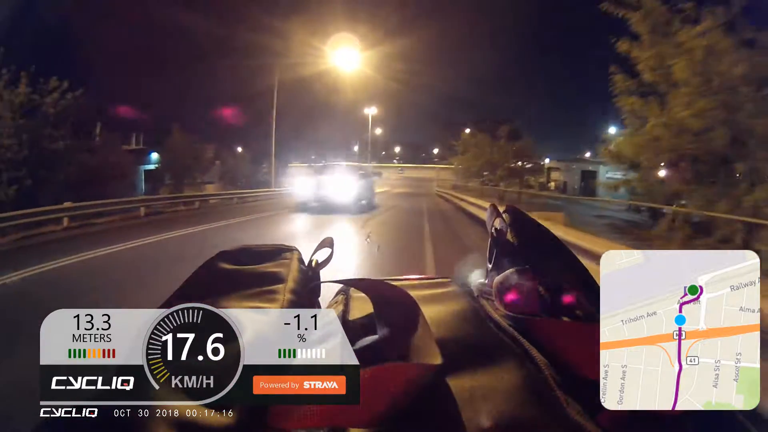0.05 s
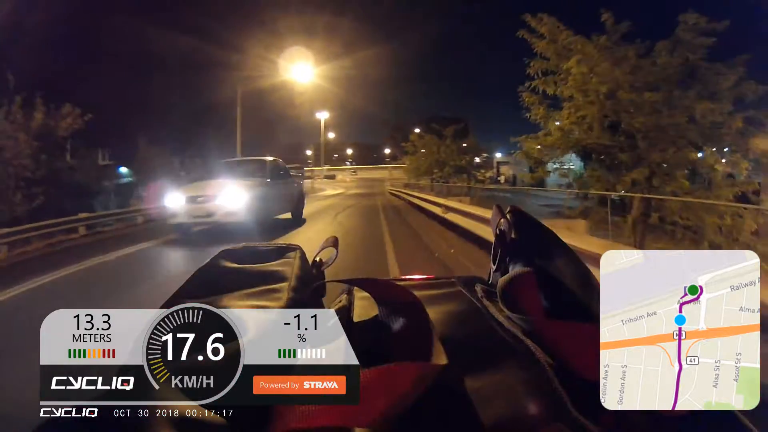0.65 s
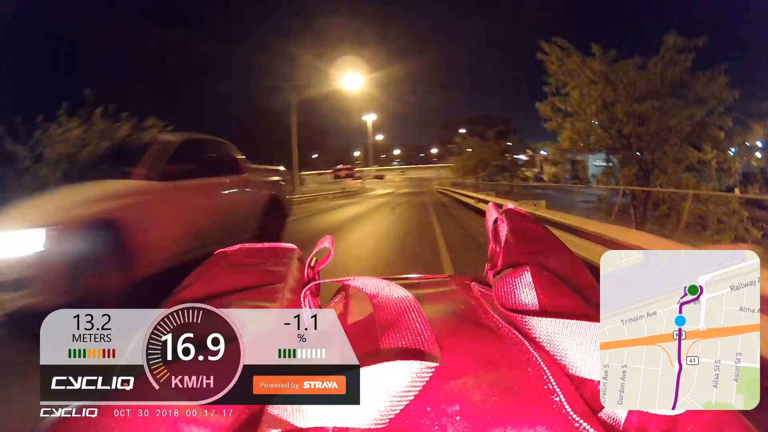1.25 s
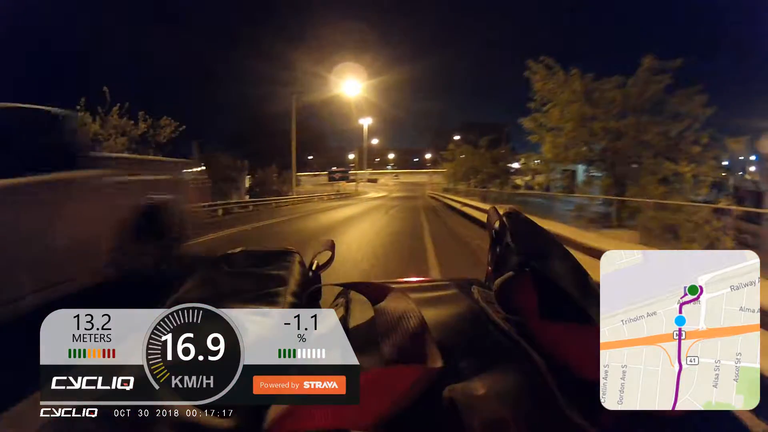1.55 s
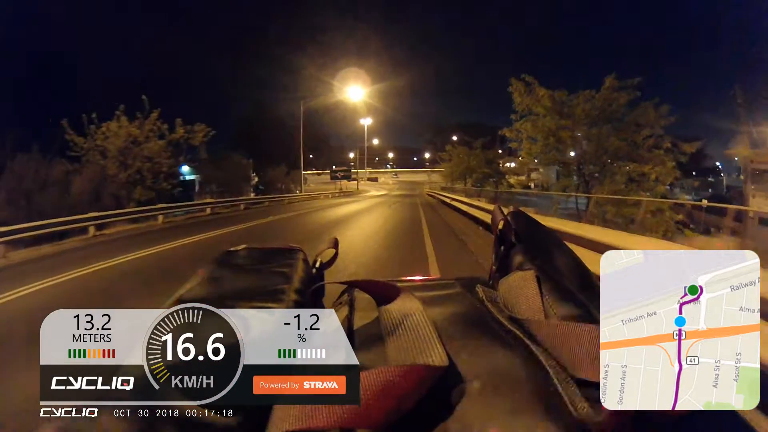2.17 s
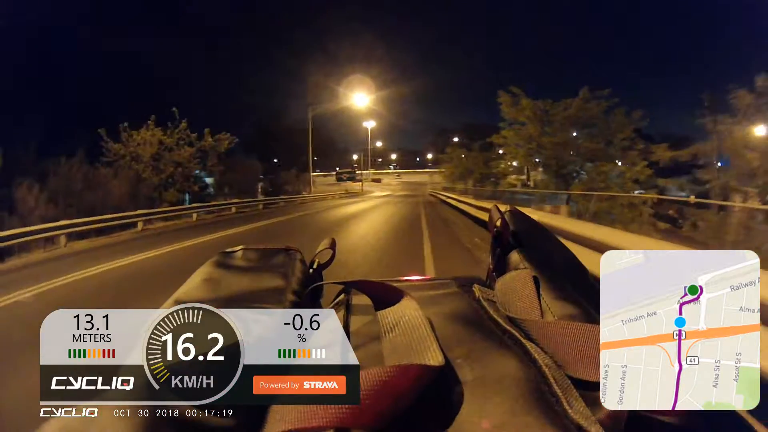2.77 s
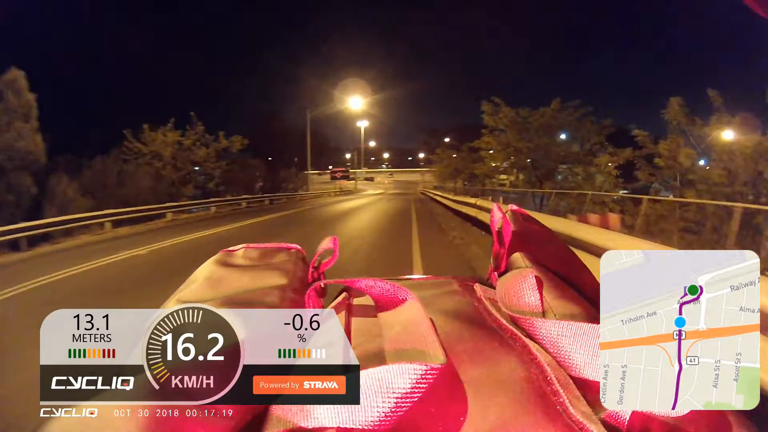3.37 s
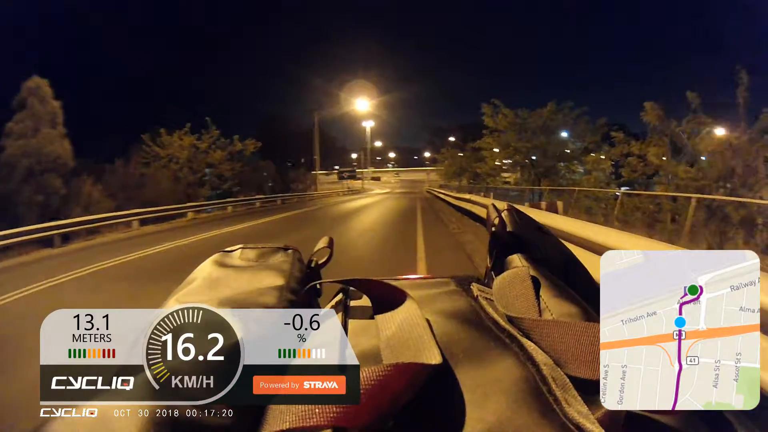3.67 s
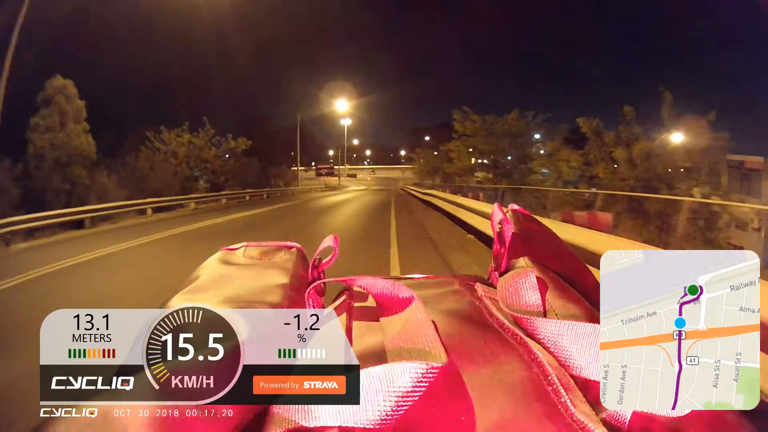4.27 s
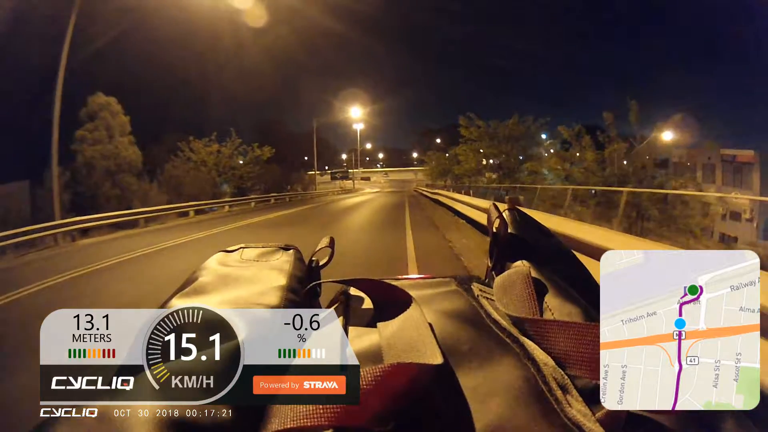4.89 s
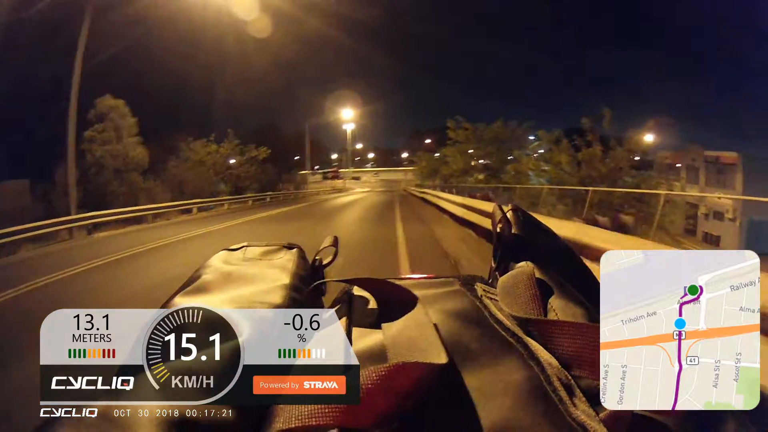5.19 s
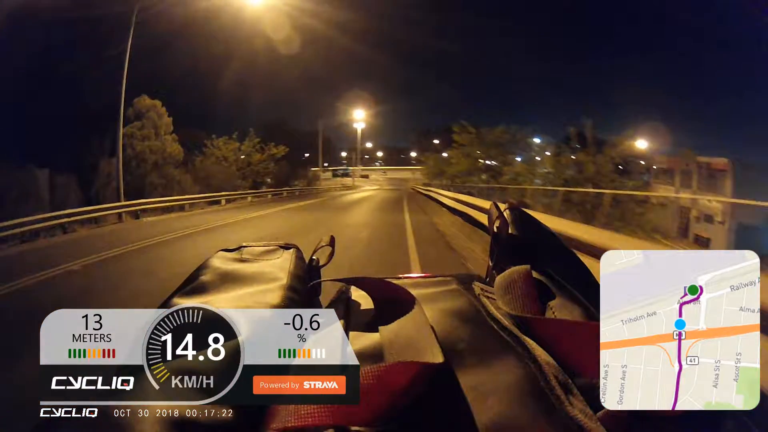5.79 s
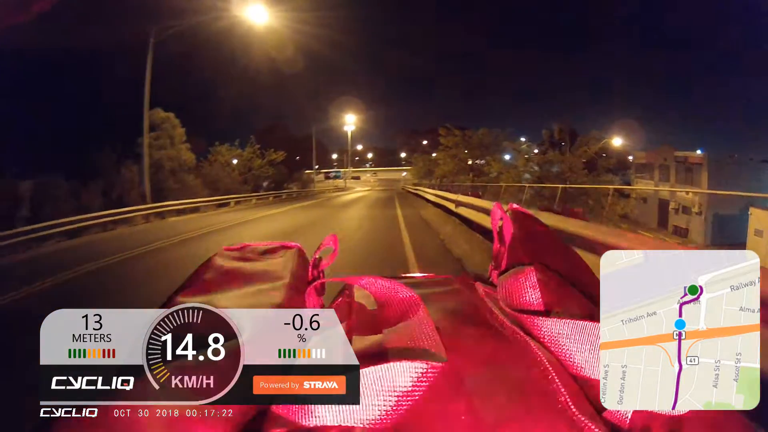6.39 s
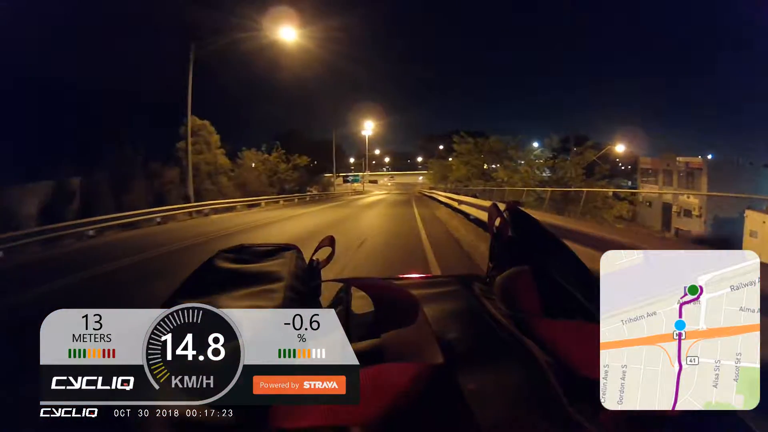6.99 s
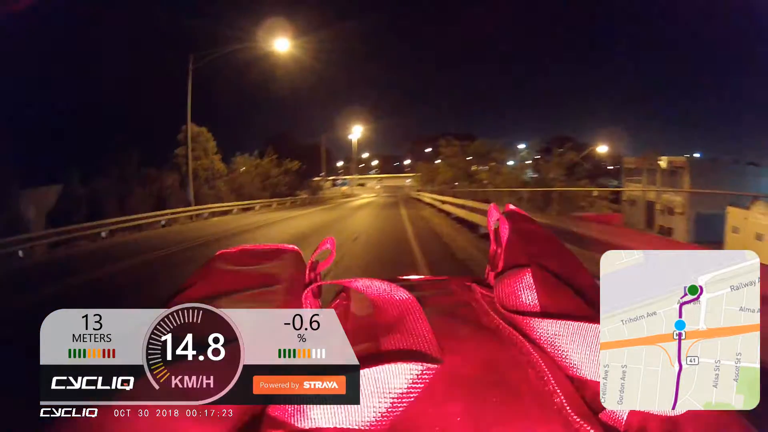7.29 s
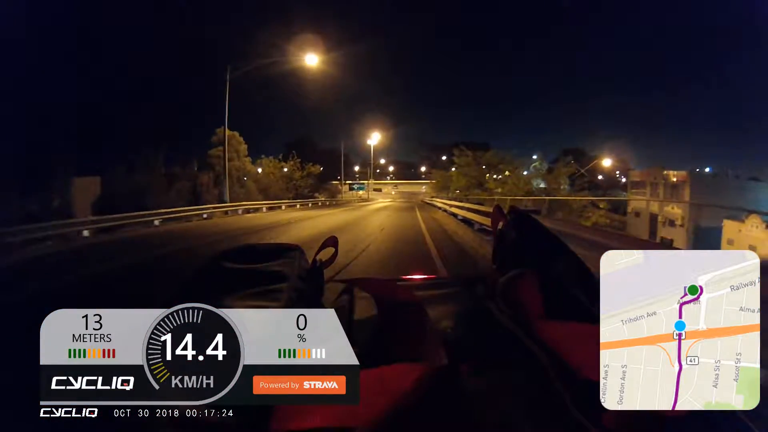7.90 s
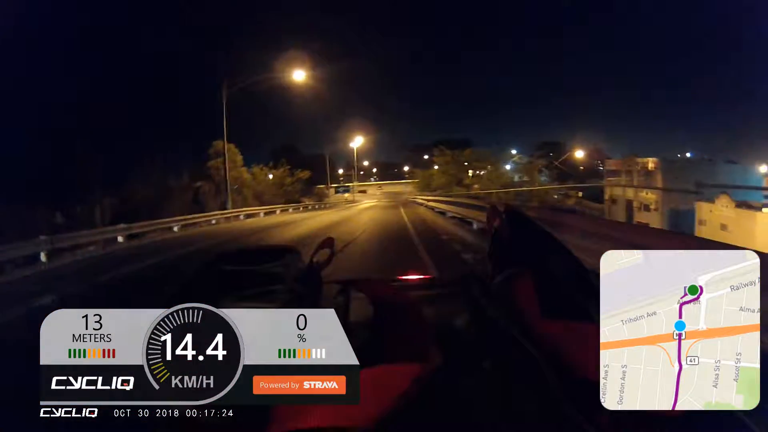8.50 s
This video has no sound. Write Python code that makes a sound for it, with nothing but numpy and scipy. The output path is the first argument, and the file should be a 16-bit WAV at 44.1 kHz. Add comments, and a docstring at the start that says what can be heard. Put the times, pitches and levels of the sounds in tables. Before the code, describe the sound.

A loaded bicycle rolls over rough asphalt in the open air, heard from a microphone fixed to it. A steady hiss of wind and tyres and a low road rumble run throughout. From the start, loose fittings clack sharply and irregularly very close by, and a small metal part buzzes in short bursts. A car overtakes closely, its tyre roar swelling to a peak around 1.5 to 2 seconds and fading by about 4. Near 2 seconds, two quick bumps make the loudest crashes, followed by tiny metallic pings and more knocks until 3. From 3 to 5 seconds the ride is calmer, with light ticks and soft wheel thumps. Scattered clacks and brief rattles return from 5 seconds, clustering around 6.3, 7.5 and 8.5 seconds. Near the end, another car faintly approaches from ahead.

```python
"""A road at night, from the two microphones of a rear-facing camera fixed to a loaded bicycle.
Close by, loose fittings clack and a small metal part buzzes, ringing the camera's mount; two bumps
crash through the frame and softer thumps follow. Rough asphalt rumbles under a steady hiss of wind
and tyres. A car overtakes two metres away, and another draws near from far ahead."""
import sys
import numpy as np
from scipy import signal
from scipy.fft import irfft, next_fast_len
from scipy.io import wavfile
from scipy.ndimage import uniform_filter1d

SR = 44100
rng = np.random.default_rng(int(sys.argv[2]) if len(sys.argv) > 2 else 0)


def persist_wave(psi):
    """Save psi, clipped to +-1, as 16-bit WAV."""
    counts = np.round(np.clip(psi, -1, 1) * 32767).astype(np.int16)
    wavfile.write(sys.argv[1], SR, np.atleast_2d(counts).T)


N = 381465
HIT = np.arange(SR // 8) / SR  # time within one blow, s
DETUNE, SCATTER_DB = 0.005, 1.3  # how the mount's modes vary in pitch and level from contact to contact

# deep rumble of the rolling wheels: frequency_hz, density_db
WHEEL_SPECTRUM = [(25, -17), (55, -13), (88, 4), (115, -0.5), (170, 2.5), (260, -3.5), (450, -2),
                  (750, -21.5), (2500, -59)]
# unpitched crack of a contact: frequency_hz, density_db
CRACK_SPECTRUM = [(100, -54), (400, -5), (750, -1.5), (1050, 7.5), (1300, 1), (1600, 3), (3200, 3),
                  (4200, -0.5), (7500, -5), (10000, -7.5), (12000, -10), (16000, -18)]
# bounces of the load: start_s, level_db, length_s
LOAD_BOUNCES = [(0.029, -30, 0.011), (0.047, -34, 0.034), (0.088, -32, 0.018), (0.104, -32.5, 0.029),
                (0.146, -32, 0.022), (0.181, -28, 0.017), (0.194, -28.5, 0.021), (0.237, -32, 0.027),
                (0.276, -35.5, 0.032), (0.698, -38.5, 0.026), (1.203, -32, 0.014), (1.257, -35.5, 0.019),
                (1.29, -31.5, 0.031), (1.342, -28, 0.041), (1.379, -27.5, 0.048), (1.447, -29.5, 0.013),
                (1.48, -28, 0.033), (1.537, -30, 0.0084), (1.633, -33, 0.0089), (2.023, -28.5, 0.021),
                (6.252, -41, 0.018)]


def gain_of(db):
    """Decibels to amplitude."""
    return 10 ** (np.asarray(db) / 20)


def unit_rms(x):
    """Scales to rms 1."""
    return x / np.sqrt(np.mean(x ** 2) + 1e-20)


def curve_at(points, hz):
    """Interpolates a curve on a log-frequency axis."""
    point_hz, value = np.transpose(points)
    return np.interp(np.log(hz + 1), np.log(point_hz), value)


def add(mix, start_s, sound):
    """Adds a stereo sound to the mix at start_s."""
    part = mix[:, max(round(start_s * SR), 0):][:, :sound.shape[1]]
    part += sound[:, :part.shape[1]]


def pan(left_db):
    """Gains that make the left microphone left_db louder than the right."""
    return gain_of(np.array([[0.5], [-0.5]]) * left_db)


def highpass(x, hz):
    """The part of x above hz, with a gentle slope."""
    return signal.sosfiltfilt(signal.butter(2, hz, "high", fs=SR, output="sos"), x)


def resonance(x, hz, width_hz):
    """One resonance of gain 1."""
    return signal.lfilter(*signal.iirpeak(hz, hz / width_hz, fs=SR), x)


def wander(per_s):
    """A random curve of rms 1 with per_s turning points a second."""
    knots_s = np.arange(0, N / SR + 1, 1 / per_s)
    return unit_rms(np.interp(np.arange(N) / SR, knots_s, rng.standard_normal(len(knots_s))))


def noise(spectrum, size, lean=None, shared=0.0):
    """Coloured stereo noise; a share of its power is common to both microphones."""
    padded = next_fast_len(size)
    hz = np.fft.rfftfreq(padded, 1 / SR)
    bins = rng.standard_normal((3, len(hz))) + 1j * rng.standard_normal((3, len(hz)))
    bins = (np.sqrt(1 - shared) * bins[:2] + np.sqrt(shared) * bins[2]) * gain_of(curve_at(spectrum, hz))
    if lean is not None:
        bins *= pan(curve_at(lean, hz))
    return unit_rms(irfft(bins, padded)[:, :size])


def airborne(spectrum, lean, slant):
    """Noise through the air, partly alike at the two microphones; with more slant the left leads more."""
    # likeness of the two microphones: frequency_hz, correlation
    likeness = [(400, 0.63), (800, 1), (1800, 0.31), (5000, 0.04)]
    # phase between them at a slant of 1: frequency_hz, left_lead_rad
    lead = [(400, 0.41), (600, 3), (820, 2.7), (1500, 3.87)]
    padded = next_fast_len(N)
    hz = np.fft.rfftfreq(padded, 1 / SR)
    common, separate = rng.standard_normal((2, len(hz))) + 1j * rng.standard_normal((2, len(hz)))
    alike = curve_at(likeness, hz)
    left = common * np.exp(1j * slant * curve_at(lead, hz))
    right = alike * common + np.sqrt(1 - alike ** 2) * separate
    bins = np.array([left, right]) * gain_of(curve_at(spectrum, hz)) * pan(curve_at(lean, hz))
    return unit_rms(irfft(bins, padded)[:, :N])


def frame(push):
    """A push sounds through the hollows of the frame and its load, with little left below them."""
    # hollow resonances: pitch_hz, width_hz, level_db
    hollows = [(296.5, 28, 1), (339.5, 25, 3.5), (391, 39, 3), (460, 74, 0.5), (567, 47, 2.5)]
    body = sum(gain_of(db) * resonance(push, hz, width_hz) for hz, width_hz, db in hollows)
    return unit_rms(highpass(body, 171))


def mount(ring, tilt_db, scatter_db=0.0, detune=0.0):
    """The camera's mount rings from one tap; ring scales its decay times, and tilt_db is per octave."""
    # its modes at the microphones: pitch_hz, t60_s, left_db, right_db, left_lead_rad
    modes = [(1014.5, 0.04, -10, -12.5, 1.5), (1153, 0.048, -13, -27, -5.5),
             (1401, 0.044, -18.5, -30.5, -1), (1597, 0.043, -11.5, -17, -1.74),
             (1930, 0.011, -3, -18, -5.5), (2180, 0.0067, -4, -38, -11), (2531, 0.039, -7, -12.5, -0.8),
             (2900, 0.0033, 6, -35, 9), (3375, 0.027, 0, -10, -3), (4280, 0.05, -52, -16, 1.5),
             (5300, 0.033, -28, -14, -7), (6850, 0.012, -24, -15.5, 1.5), (8220, 0.012, -11.5, -11.5, 2),
             (10350, 0.0076, -13, -25, 5)]
    hz, t60_s, left_db, right_db, lead = np.transpose(modes)[:, :, None]
    # the place of the tap varies each mode's share and pitch, the pitch more above 3 kHz
    hz = hz * (1 + detune * np.maximum(1, hz / 3000) ** 2 * rng.uniform(-0.82, 1, hz.shape))
    share = gain_of(tilt_db * np.log2(hz / hz[0]) + scatter_db * rng.standard_normal(hz.shape))
    decay = share * gain_of(-60 * HIT / (t60_s * ring))
    phase = 2 * np.pi * hz * HIT + np.pi * np.arange(len(hz))[:, None]  # neighbours swing oppositely
    left = gain_of(left_db) * decay * np.sin(phase)
    right = gain_of(right_db) * decay * np.sin(phase - lead)
    return np.array([left.sum(0), right.sum(0)])


def shaking(steady_db, jolt_db=-12, smooth_s=0.165):
    """Strength of the road's shaking in dB: steady, but harder wherever the load bounces."""
    t = np.arange(N) / SR
    jolt_power = sum(gain_of(db + jolt_db) ** 2 * ((t >= start_s) & (t < start_s + length_s))
                     for start_s, db, length_s in LOAD_BOUNCES)
    return 10 * np.log10(gain_of(steady_db) ** 2 + uniform_filter1d(jolt_power, round(smooth_s * SR)))


def road(grit_per_s=260, steady_db=-55):
    """Rough asphalt shakes the frame; its grit keeps the mount ringing and the metal part jingling."""
    shake_db = shaking(steady_db)
    rumble = noise(WHEEL_SPECTRUM, N, lean=[(70, -6), (200, -1.5)], shared=0.98)
    rumble *= gain_of(-61.5 + 3.7 * wander(12))
    body = frame(noise(WHEEL_SPECTRUM, N, shared=0.92)) * pan(1.4)
    body *= gain_of(shake_db + 0.084 * wander(12))
    grit = (rng.random(N) < grit_per_s / SR) * gain_of(6.1 * np.minimum(rng.exponential(1, N), 3))
    drive = (grit + 0.34) * rng.standard_normal(N)
    ringing = unit_rms(signal.oaconvolve(drive[None], mount(0.93, tilt_db=-7), axes=1)[:, :N])
    jingle = unit_rms(resonance(resonance(drive, 3386, 320), 3540, 600)) * pan(5.5)
    jingle *= gain_of(-64.5 + 3.5 * wander(22))
    ringing *= gain_of(-51.5 + 0.5 * (shake_db - steady_db) + 0.43 * wander(28))
    return rumble + body + jingle + ringing


def hiss():
    """Wind and the bicycle's own tyres, with a slight flutter and a slow drift in the middle range."""
    # colour of the hiss: frequency_hz, density_db
    spectrum = [(100, -57), (500, 7.5), (750, -5.5), (1100, -3.5), (1600, 1.5), (2500, -2.5), (3200, -8.5),
                (4800, -8.5), (7000, -15.5), (11000, -21), (16000, -26.5)]
    # its balance at the microphones: frequency_hz, left_over_right_db
    lean = [(700, 4), (1400, -16.5), (2500, -7.5), (3300, -1.5), (4600, -10), (8000, -1.5), (15000, 3)]
    air = airborne(spectrum, lean, slant=0.27)
    drift = (gain_of(wander(4.3)) - 1) * resonance(air, 2000, 2900)
    return (air + drift) * gain_of(-51 + 1.84 * wander(28))


def cars(loss_db_per_m=0.27, dull_db_per_m=1.5, shadow_m=17.2, drone_reach_m=3.52):
    """Tyre roar swells and brightens as a car nears, its treads howl, and its drone fills the frame."""
    # cars relative to the bicycle: start_ahead_m, speed_m_per_s, gap_m, alongside_db, howl_db, drone_db
    passes = [(-9, 5.5, 2.01, -34, -0.5, -9), (104, -10.5, 10.2, -30, -17, -16.5)]
    # tyre roar: frequency_hz, density_db
    spectrum = [(100, -67), (400, -1.5), (780, -1), (1050, 1), (1300, -1), (2600, 1.5), (3500, -4),
                (4500, -5.5), (7300, -11.5), (9200, -20), (12000, -20), (16000, -34)]
    # its balance at the microphones: frequency_hz, left_over_right_db
    lean = [(700, 0), (1300, -10), (2600, 4), (4500, -4.5), (15000, 5.5)]
    # bands the treads beam in different directions:
    # pitch_hz, width_hz, level_db, extra_left_db, loudest_ahead_m, reach_m
    tread_bands = [(1400, 1400, 0, -14, -6.5, 3.8), (12100, 4500, -25, -2, -3.5, 2),
                   (2650, 1700, -0.5, 13, 2.5, 1.5), (970, 1040, 0.5, -1.5, 7, 5.1)]
    roar = airborne(spectrum, lean, slant=0.86)
    sizzle = highpass(roar, 4200)
    tread = airborne(spectrum, lean, slant=0.62)
    beams = []
    for hz, width_hz, db, left_db, at_m, reach_m in tread_bands:
        band = resonance(resonance(tread, hz, width_hz), hz, width_hz) * pan(left_db)
        beams.append((gain_of(db) * unit_rms(band), at_m, reach_m))
    drone = frame(noise(WHEEL_SPECTRUM, N, shared=1)) * pan(1.8)
    out = np.zeros((2, N))
    for start_m, speed, gap_m, db, howl_db, drone_db in passes:
        ahead = start_m + speed * np.arange(N) / SR
        distance = np.hypot(ahead, gap_m)
        shadow = np.clip(ahead / shadow_m, 0, 1) ** 2  # the rider and bags screen a car that is ahead
        level_db = db - 20 * np.log10(distance / gap_m) - loss_db_per_m * (distance - gap_m) - 8 * shadow
        treble_db = 6.5 - dull_db_per_m * distance - 37 * shadow + 0.64 * wander(90)
        nose_db = -(ahead / distance) ** 2 * (ahead < 0)  # a car behind throws less roar forwards
        tyres = (roar + (gain_of(treble_db) - 1) * sizzle) * gain_of(nose_db)
        howl = sum(band * np.exp(-((ahead - at_m) / reach_m) ** 2) for band, at_m, reach_m in beams)
        drone_gain = gain_of(db + drone_db) * drone_reach_m / np.hypot(ahead, drone_reach_m)
        out += gain_of(level_db) * (tyres + gain_of(howl_db) * howl) + drone_gain * drone
    return out * gain_of(wander(22))


def blow(ring, crack_db, crack_s, treble_db, left_db, part_hz=3400, part_db=-6):
    """A short crack and the mount's ring, coloured by the loose part's broad resonance."""
    fade = np.exp(-HIT / crack_s) + gain_of(-22) * np.exp(-HIT / 0.019)  # the part trembles on briefly
    crack = unit_rms(noise(CRACK_SPECTRUM, len(HIT), shared=0.12) * fade * pan(left_db))
    crack[0] = np.roll(crack[0], SR // 2450)  # it reaches the left microphone a little later
    sound = unit_rms(mount(ring, tilt_db=0, scatter_db=SCATTER_DB, detune=DETUNE))
    sound += gain_of(crack_db) * crack
    sound += gain_of(part_db) * resonance(sound, part_hz, part_hz / 3)
    sound += (gain_of(treble_db) - 1) * highpass(sound, 5900)
    sound *= 1 - np.exp(-HIT / 0.00026)
    attack_rms = np.sqrt(np.mean(sound[:, :SR // 250] ** 2))
    return sound / (np.pi * attack_rms)  # peak near 1


def clack(fitting, db, medium_db=-11.5):
    """A fitting strikes its stop; harder blows are brighter, and short ones carry more of its colour."""
    # loose fittings at a medium blow, by name: treble_db, ring_factor, pitch_hz
    fittings = {"knock": (-7, 1.19, 1120), "clack": (-7.5, 1.0, 2230), "snap": (3.8, 0.82, 2190),
                "clink": (-4, 1.14, 2400), "chink": (4.7, 1, 2960), "tap": (-7.5, 0.95, 1540)}
    treble_db, ring, hz = fittings[fitting]
    sound = blow(ring, crack_db=0, crack_s=0.0038 * ring, treble_db=treble_db + db - medium_db,
                 left_db=0.5, part_hz=hz, part_db=34 * (1 - ring))
    low_cut = signal.butter(8, 990, "high", fs=SR, output="sos")  # too light to move the frame
    return gain_of(db) * (signal.sosfilt(low_cut, sound) + gain_of(-35) * sound)


def clacks():
    """Loose fittings near the microphones strike singly or rattle in quick, even rebounds."""
    # single blows: start_s, level_db, fitting
    strikes = [(0.017, -12.5, "chink"), (0.2154, -9, "knock"), (0.3444, -16, "clink"),
               (.571, -17.5, "clink"), (1.2234, -13, "snap"), (1.583, -7, "knock"), (1.602, -11.5, "chink"),
               (1.7892, -18, "tap"), (1.9434, -18, "chink"), (1.9638, -12.5, "tap"), (2.0116, -8, "knock"),
               (2.03, -12.5, "tap"), (2.4084, -10.5, "knock"), (2.5926, -7.5, "knock"),
               (2.7973, -13, "snap"), (2.861, -12.5, "clink"), (5.103, -11, "knock"),
               (5.9128, -13.5, "snap"), (6.2458, -10, "clink"), (6.3987, -19, "tap"), (7.136, -21, "snap"),
               (7.3424, -34, "clink"), (7.3975, -8.5, "clack"), (7.5695, -14.5, "snap"),
               (7.647, -20, "tap"), (8.4604, -12, "snap"), (8.5648, -8.5, "knock"), (8.6275, -8.5, "clink")]
    # rattles of the tapping fitting: start_s, first_db, length_s, gap_s, change_per_rebound_db
    rattles = [(0.4775, -15.5, .07, 0.028, 0), (5.245, -22.5, .02, 0.013, -5),
               (6.4149, -16, .04, .0156, -5.5), (7.594, -17.5, .04, 0.015, -1)]
    out = np.zeros((2, N))
    for start_s, db, fitting in strikes:
        add(out, start_s, clack(fitting, db))
    for start_s, db, length_s, gap_s, change_db in rattles:
        for rebound, after_s in enumerate(np.arange(0, length_s, gap_s)):
            add(out, start_s + after_s, clack("tap", db + rebound * change_db))
    return out * gain_of(1.5) * pan(0.56)


def buzzing(length_s, db, firm_db=-28, rebounds_per_s=900, width_hz=330):
    """Fast rebounds scrape the mount and buzz a small metal part; firm contacts are brighter."""
    force_db = db - firm_db
    press = np.sin(np.pi * np.minimum(HIT / length_s, 1))
    press += gain_of(-13) * np.exp(-HIT / 0.025)  # the part keeps scraping lightly after the contact
    taps = press * (0.34 + (rng.random(len(HIT)) < rebounds_per_s / SR))
    drive = taps * rng.standard_normal(len(HIT))
    # the pressing part shortens the mount's ring
    damped = mount(0.85, tilt_db=1 + 0.49 * force_db, scatter_db=SCATTER_DB, detune=3 * DETUNE)
    ringing = signal.fftconvolve(drive[None], damped, axes=1)[:, :len(HIT)]
    grain = np.sqrt(uniform_filter1d(taps ** 4, size=60).clip(0))  # each rebound is a tiny burst
    scrape = noise(CRACK_SPECTRUM, len(HIT)) * grain
    hz = 3400 + 60 * rng.standard_normal()  # the part sits a little differently at each bounce
    buzz = resonance(resonance(scrape, hz, width_hz), hz, 2 * width_hz) * pan(11)
    scrape = unit_rms(scrape * pan(1.6))
    scrape += (gain_of(min(2.6 * force_db, 2.5)) - 1) * highpass(scrape, 4000)
    sound = unit_rms(ringing) + gain_of(-3.5 - 0.16 * force_db) * unit_rms(buzz) + gain_of(-1) * scrape
    return gain_of(db) * unit_rms(sound) * np.sqrt(length_s / HIT[-1])


def chatter():
    """The load bounces unevenly, and each bounce presses the metal part into a short buzz."""
    out = np.zeros((2, N))
    for start_s, db, length_s in LOAD_BOUNCES:
        add(out, start_s, buzzing(length_s, db))
    return out


def ticks(faint_per_s=8):
    """Small dry contacts with a little ring of the mount, and at random fainter, thinner ones."""
    # light contacts on the right: start_s, level_db, low_ring_db
    contacts = [(0.632, -28.5, -47), (0.6645, -32.5, -48.5), (1.088, -37, -64), (2.212, -27, -67),
                (2.2348, -31.5, -65), (2.903, -45, -55), (3.5744, -29.5, -56), (3.826, -45, -53),
                (4.0376, -44, -56), (4.2504, -39, -57.5), (4.994, -35.5, -66), (5.319, -32, -80),
                (5.839, -30, -74), (6.895, -27.5, -79)]
    out = np.zeros((2, N))
    for start_s, db, ring_db in contacts:
        tick = blow(1.8, crack_db=9, crack_s=0.0042, treble_db=-2.5, left_db=-6, part_hz=4800, part_db=18)
        add(out, start_s, gain_of(db + 2) * tick)
        add(out, start_s, gain_of(ring_db) * unit_rms(mount(1, tilt_db=-7)))
    for when, strength in rng.random((round(faint_per_s * N / SR), 2)):
        tick = blow(0.61, crack_db=7, crack_s=0.006, treble_db=-2, left_db=-1)
        add(out, when * N / SR, gain_of(-42.5 + 6.7 * strength) * highpass(tick, 3300))
    return out


def bumps(thud_s=0.059):
    """A bump jolts the whole bicycle: everything loose crashes at once and the frame knocks hollowly."""
    # bumps in the road: start_s, crash_db, relative_thud_db
    jolts = [(1.8906, -4.5, -20), (2.0004, -3.5, -23.5)]
    out = np.zeros((2, N))
    for start_s, crash_db, thud_db in jolts:
        crash = blow(2.1, crack_db=32, crack_s=0.0089, treble_db=-2.5, left_db=2)
        low_ring = unit_rms(mount(3.1, tilt_db=-8))  # the mount's lowest modes swing on
        thud = frame(noise(WHEEL_SPECTRUM, len(HIT), shared=0.96) * np.exp(-HIT / thud_s))
        add(out, start_s, gain_of(crash_db) * crash)
        add(out, start_s + 0.0053, gain_of(crash_db - 28.5) * low_ring)
        add(out, start_s, gain_of(thud_db - 12.5) * thud)
    return highpass(out, 235)  # the bumps carry no deep bass


def pings(rise_s=0.0021, ring_s=0.011):
    """Flung clear by the harder bump, the metal part rings until it settles back against the load."""
    # its clear notes: start_s, level_db, pitch_hz
    notes = [(2.0115, -25, 3460), (2.03, -20.5, 3450)]
    envelope = (1 - np.exp(-HIT / rise_s)) * np.exp(-(HIT / ring_s) ** 2)
    out = np.zeros((2, N))
    for start_s, db, hz in notes:
        add(out, start_s, gain_of(db) * pan(10) * np.sin(2 * np.pi * hz * HIT) * envelope)
    return out


def thumps(rise_s=0.0084, fade_s=0.022):
    """A wheel drops over uneven asphalt: a soft push on the frame, which then jiggles the mount."""
    # drops of a wheel: start_s, relative_db
    drops = [(2.934, -54), (3.325, -59), (3.431, -49.5), (4.037, -54), (4.724, -49), (4.999, -52.5),
             (6.169, -51), (6.561, -48.5)]
    envelope = (1 - np.exp(-HIT / rise_s)) * np.exp(-(HIT / fade_s) ** 2)
    out = np.zeros((2, N))
    for start_s, db in drops:
        push = noise(WHEEL_SPECTRUM, len(HIT), shared=0.92) * envelope
        jiggle = blow(2.3, crack_db=4, crack_s=0.0022, treble_db=-4, left_db=-6)
        add(out, start_s, gain_of(db - 9) * (unit_rms(push) + gain_of(3) * frame(push)))
        add(out, start_s + 0.012, gain_of(db + 11.5) * jiggle)
    return out


def scene():
    """The bicycle's close rattles and jolts over road, wind and traffic, in the open air."""
    return clacks() + ticks() + chatter() + pings() + bumps() + thumps() + road() + hiss() + cars()


def record(dry, ceiling=0.6, edge_hz=16100):
    """The hardest blows overload the microphones softly; the camera cuts the highest treble."""
    rounded = dry / (1 + (dry / ceiling) ** 4) ** (1 / 4)
    band_limit = signal.firwin(301, edge_hz, window=("kaiser", 8), fs=SR)
    return signal.oaconvolve(rounded, band_limit[None], "same")


dry = scene()
out = record(dry)
persist_wave(out)
```